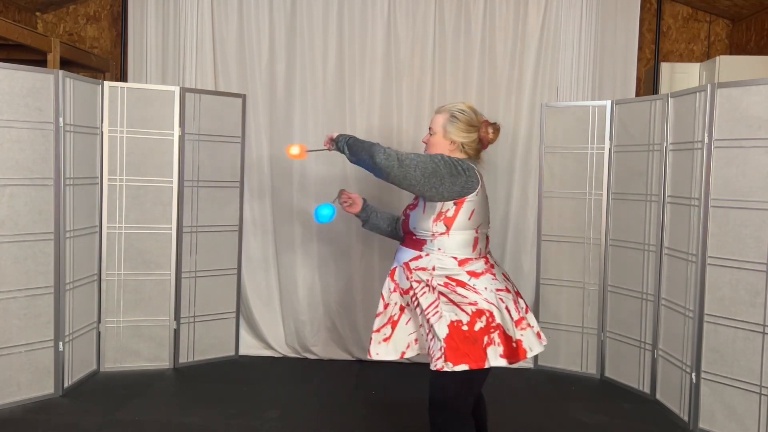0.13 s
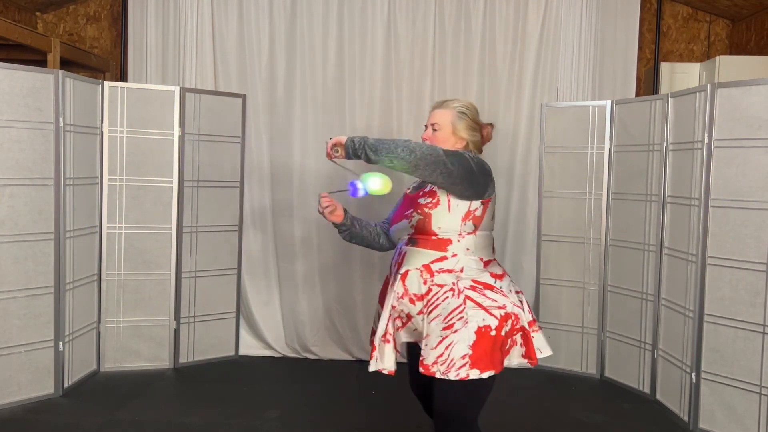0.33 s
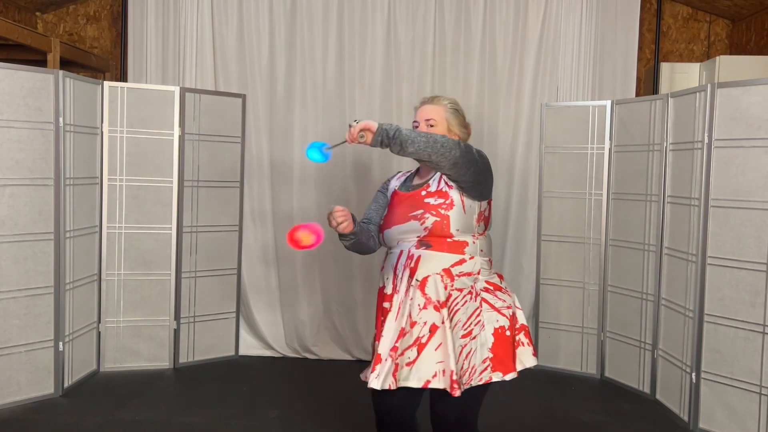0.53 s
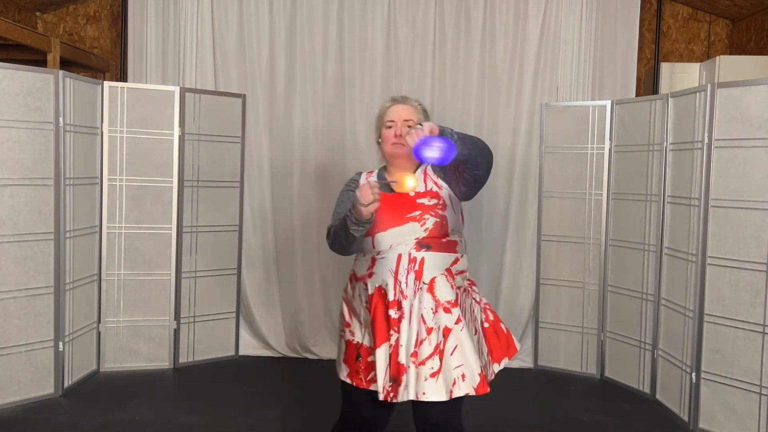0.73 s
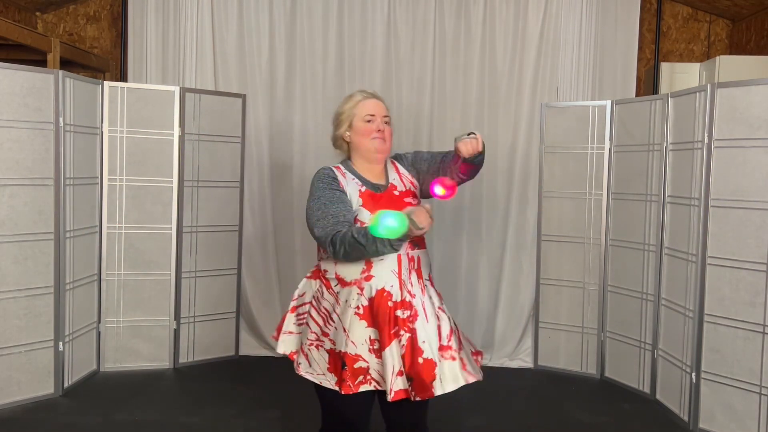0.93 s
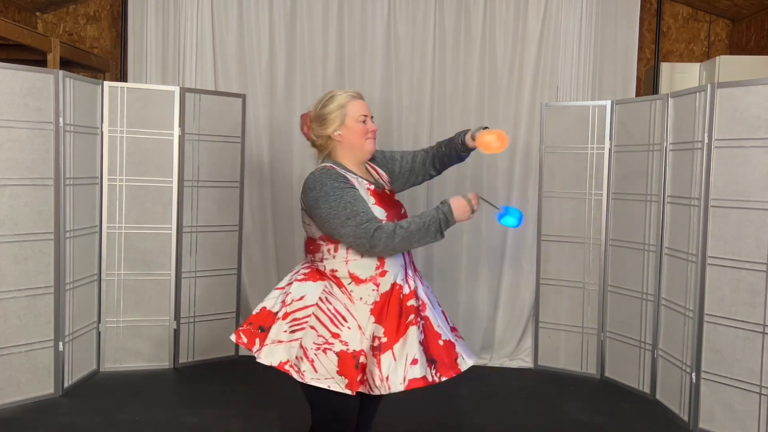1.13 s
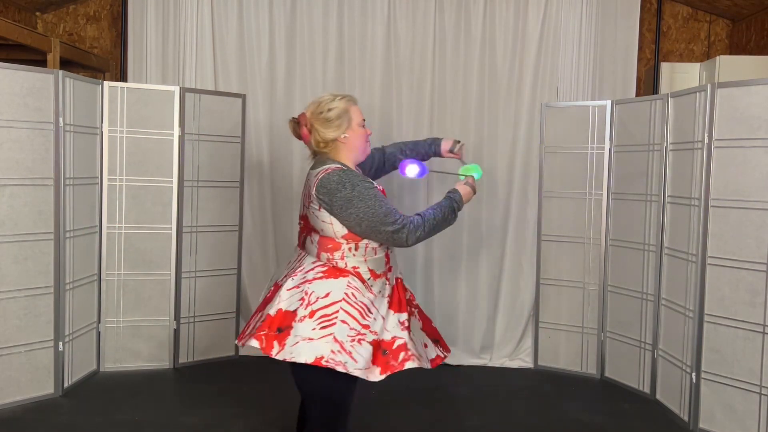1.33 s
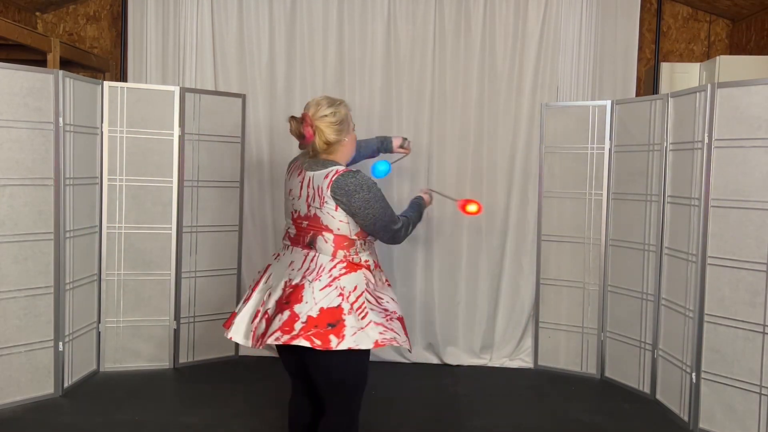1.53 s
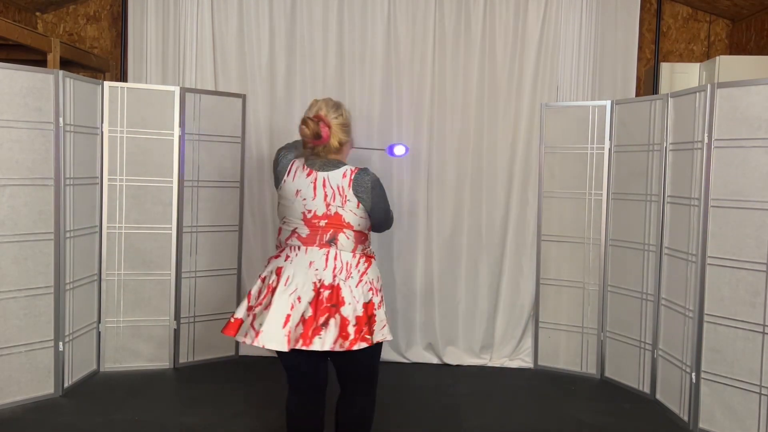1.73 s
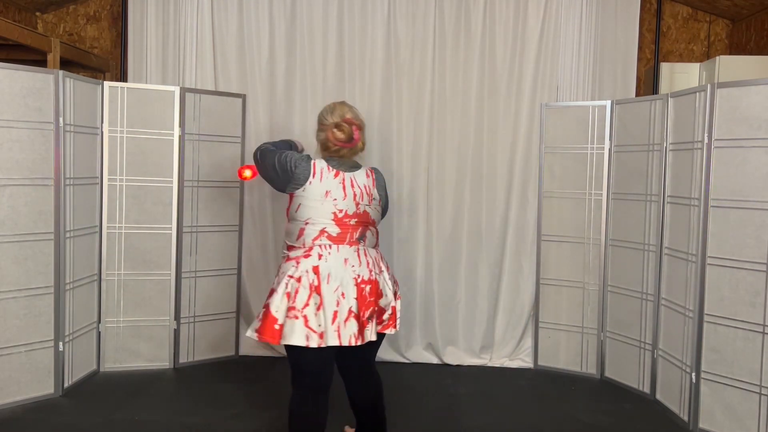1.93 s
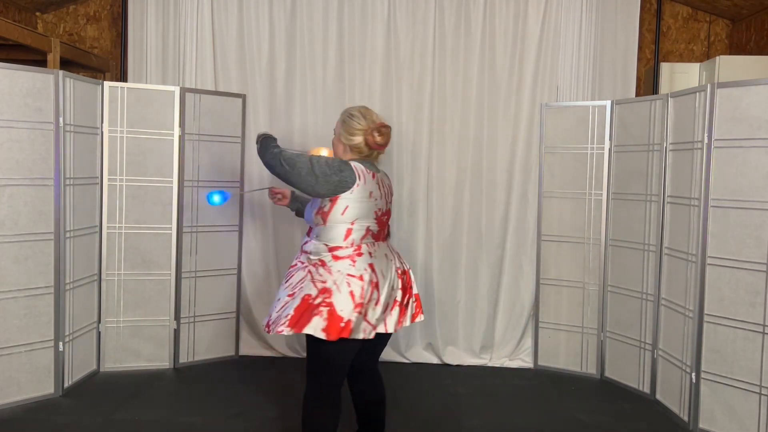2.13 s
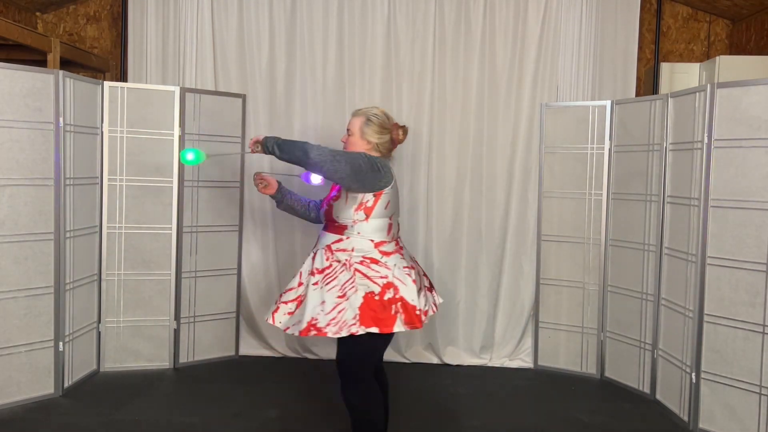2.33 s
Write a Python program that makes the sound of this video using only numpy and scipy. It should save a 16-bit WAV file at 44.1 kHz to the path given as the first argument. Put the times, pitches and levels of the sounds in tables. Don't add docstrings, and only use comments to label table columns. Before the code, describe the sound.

Dancer's footwork on sprung boards: brushing soles, low booms, a cluster of taps, a short squeak, airy whirs from cloth and swung weights, then a final step and long swish, captured indoors at low level over room rumble.

```python
import sys
import numpy as np
from scipy import signal
from scipy.fft import rfft, irfft
from scipy.io import wavfile
from scipy.ndimage import uniform_filter1d

SR = 44100
rng = np.random.default_rng(int(sys.argv[2]) if len(sys.argv) > 2 else 0)


def unload_wav(signal):
    wavfile.write(
        sys.argv[1],
        SR,
        np.round(np.clip(np.atleast_2d(signal).T, -1, 1) * 32767).astype(np.int16),
    )


def linear_from_db(decibels):
    return 10 ** (np.asarray(decibels, float) / 20)


N = 104781
SWISH_FALL_DB_PER_S = 291
GRAINS_PER_S, GRAIN_SPREAD_DB = 9000, 0.5
SLIPS_PER_S, SLIP_SPREAD_DB = 2700, 3


def evened(x):
    return x / np.sqrt(np.mean(x ** 2) + 1e-20)


def read(points, hz):
    f, value = np.transpose(points)
    return np.interp(np.log(hz + 1), np.log(f + 1), value)


def colour(x, points):
    gain = linear_from_db(read(points, np.fft.rfftfreq(N, 1 / SR)))
    return irfft(rfft(x) * gain, N)


def stroke(start, rise, hold, level_db, fall_db):
    t = np.arange(N) / SR - start
    swell = np.clip(t / rise, 0, 1) ** 2
    return swell * linear_from_db(level_db - fall_db * np.clip(t - rise - hold, 0, None))


def combined(rows, fall_db):
    return np.sqrt(sum(stroke(*row[:4], fall_db) ** 2 for row in rows))


def drift(hz):
    low_pass = signal.butter(2, hz, fs=SR, output="sos")
    return evened(signal.sosfiltfilt(low_pass, rng.standard_normal(N)))


def grit(rate, spread_db):
    size = linear_from_db(spread_db * np.minimum(rng.exponential(1, (2, N)), 5))
    size = size * rng.choice([-1., 1.], (2, N))
    return evened(size * (rng.random((2, N)) < rate / SR))


def ring(x, hz, q):
    b, a = signal.iirpeak(hz, q, SR)
    y = signal.lfilter(b, a, signal.lfilter(b, a, x))
    span = int(SR * max(8 / hz, .02))
    return y / np.sqrt(abs(uniform_filter1d(y ** 2, size=span)) + 1e-12)


def rings(rows, drive, q, fall_db):
    return sum(ring(drive, row[4], q) * stroke(*row[:4], fall_db) for row in rows)


def hum():
    # f/Hz, level/dB
    hum_spectrum = [(25, -13), (45, -5), (260, -14), (430, -25.5), (1200, -39), (9500, -56), (12800, -49),
                    (16000, -76)]
    # t/s, level/dB
    busy = [(0, 0.5), (.35, -0.5), (.5, -1), (.8, -2), (.95, 2), (1.12, 1), (1.22, -3.5), (1.35, -2.5),
            (1.42, 4), (1.58, 1), (1.68, -2.5), (2.0, -0.5), (2.12, 3.5), (2.3, 1), (2.38, -1.5)]
    z = signal.stft(rng.standard_normal((2, N)), nperseg=2048)[2]
    local = uniform_filter1d(uniform_filter1d(abs(z) ** 2, size=3, axis=1), size=5, axis=2)
    noise = signal.istft(z / np.sqrt(local), nperseg=2048)[1][:, :N]
    rumble_db = np.interp(np.arange(N) / SR, *np.transpose(busy))
    return linear_from_db(rumble_db - 51.5) * evened(colour(noise, hum_spectrum))


def boom():
    # start t/s, rise t/s, hold t/s, level/dB, f/Hz
    landings = [(0, .03, 0.081, -48.5, 52.1), (0.13, 0.028, 0.033, -47, 52.3),
                (0.225, 0.023, 0.025, -40.5, 52), (0.296, 0.0096, 0.075, -45, 55),
                (0.46, 0.042, 0.032, -50, 55.7), (0.54, 0.048, 0.047, -45.5, 53.3),
                (0.796, 0.051, 0.027, -43.5, 55.8), (0.86, 0.023, 0.019, -36, 50.7),
                (0.917, 0.025, 0.03, -38.5, 54.3), (1.037, 0.031, 0.07, -49, 59.3),
                (1.101, 0.029, .04, -47, 57.4), (1.184, 0.02, 0.032, -46, 56.3),
                (1.294, 0.025, 0.074, -49, 54.3), (1.427, 0.031, 0.044, -46, 54.8),
                (1.516, 0.024, 0.0086, -39, 55.6), (1.569, 0.017, 0.041, -41, 54.8),
                (1.67, 0.034, 0.037, -49.5, 55.7), (2.037, 0.044, 0.027, -49, 59.5),
                (2.109, 0.031, 0.034, -39.5, 54.9), (2.169, 0.03, 0.051, -39.5, 51.5),
                (2.26, 0.028, 0.012, -41, 55.85)]
    start, rise, _, _, hz = np.transpose(landings)
    level = combined(landings, 375) * linear_from_db(0.6 * drift(14))
    pitch = np.interp(np.arange(N) / SR, start + rise, hz) + 1.36 * drift(6.2)
    return np.sqrt(2) * level * np.sin(2 * np.pi * np.cumsum(pitch) / SR)


def thumps():
    # start t/s, rise t/s, hold t/s, level/dB, f/Hz
    impacts = [(0.2, 0.009, 0.048, -52.5, 269), (.625, 0.0057, 0.039, -47, 244), (.7, .02, 0.041, -51, 236),
               (0.7, 0.0088, 0.036, -58, 146), (1.9, 0.011, 0.069, -53.5, 146),
               (2.008, 0.01594, 0.1, -53, 243), (1.5, 0.035, 0.05, -52.5, 145),
               (0.5, 0.011, 0.012, -55, 241), (0.56, 0.016, 0.058, -50.5, 161),
               (0.12, 0.016, 0.078, -52.5, 122), (2.015, 0.011, 0.042, -53, 150), (5, .02, .04, -56, 330),
               (-0.1, 0.024, 0.061, -56.5, 270), (1.09, .01, 0.045, -58, 350), (0, .015, 0.02, -56, 233)]
    return rings(impacts, grit(600, 1.54), q=2.43, fall_db=259)


def knock():
    start_s, t60_s = .215, 0.032
    t = np.clip(np.arange(N) / SR - start_s, 0, None)
    return np.sin(2 * np.pi * 199.4 * t) * stroke(start_s, 0.013, 0.038, -41, 60 / t60_s)


def pings():
    # t/s, peak level/dB, f/Hz, decay T60 t/s
    struck = [(.636, -46, 510, 0.025), (.642, -38.5, 200, 0.044), (0.72, -42, 300, 0.047),
              (0.61, -40, 224, .04), (.668, -41, 250, 0.029), (.7015, -40.5, 206, .04),
              (.659, -47, 420, .03), (.7135, -40.5, 1270, .035), (.7205, -38.5, 1300, 0.057),
              (.728, -44, 1350, .05), (.806, -48, 1360, 0.028), (1.5095, -42, 1010, 0.019),
              (1.5095, -45.5, 1580, 0.01), (1.5095, -45, 2130, 0.011), (1.518, -43, 670, 0.016),
              (1.516, -47, 2300, .012), (2.006, -44.5, 620, 0.024), (2.032, -45, 650, .04),
              (2.041, -43.5, 680, 0.026), (2.05, -38, 160, .03), (2.4, -43.5, 190, .03),
              (2.055, -38.5, 180, 0.039), (2.093, -38, 195, 0.045), (2.027, -42.5, 1950, 0.026)]
    out, t = np.zeros(N + SR), np.arange(6000) / SR
    for s, db, hz, t60 in struck:
        out[round(s * SR):][:len(t)] += linear_from_db(db - 60 * t / t60) * np.sin(2 * np.pi * hz * t)
    return out[:N]


def taps():
    # t/s, peak level/dB, upper f/Hz
    edge_hits = [
        (0.628, -43.5, 1410),
        (0.704, -60, 13900),
        (1.509, -44, 2200),
        (1.52, -44, 2000),
        (2.005, -42.5, 8600),
        (2.015, -46, 3063),
        (1.023, -49.5, 15000),
        (2.063, -49, 5000),
    ]
    t60_s, low_hz = .03, 380
    out, t = np.zeros((2, N + SR)), np.arange(4000) / SR
    for s, db, hz in edge_hits:
        band = signal.butter(4, [low_hz, hz], "band", fs=SR, output="sos")
        burst = rng.standard_normal((2, len(t))) * linear_from_db(-60 * t / t60_s)
        burst = signal.sosfilt(band, burst)
        out[:, round(s * SR):][:, :len(t)] += linear_from_db(db) * burst / abs(burst).max()
    return out[:, :N]


def squeaks():
    # start t/s, rise t/s, hold t/s, level/dB, f/Hz
    rubs = [
        (1.024, 0.036, .045, -52.5, 1320),
        (1.06, .03, 0.018, -52.5, 840),
        (1.03, .015, .015, -65, 840),
        (1.04, 0.027, .035, -57, 1690),
        (0.13, 0.027, .05, -67, 1300),
        (2.01, .01, 0.024, -62, 2400),
    ]
    return rings(rubs, grit(SLIPS_PER_S, SLIP_SPREAD_DB), q=4.9, fall_db=600)


def drags():
    # start t/s, rise t/s, hold t/s, level/dB, f/Hz
    scrapes = [(-.01, 0.0058, 0.0061, -55, 1240), (.04, 0.059, 0.046, -65.5, 1440),
               (.14, 0.03, 0.15, -77, 1230), (.62, 0.0034, 0.013, -62, 1103),
               (.702, 0.0054, 0.029, -48, 1490), (.76, 0.015, 0.012, -55.5, 1900),
               (.86, .03, 0.046, -80, 2170), (1.018, 0.017, 0.06, -58.5, 1420),
               (1.025, 0.037, 0.043, -60.5, 890), (1.28, 0.015, 0.14, -60, 1730),
               (1.508, 0.0034, 0.006, -56.5, 1110), (1.53, 0.024, 0.013, -67, 1484),
               (2.005, 0.0047, 0.038, -51.5, 1790), (2.005, 0.0087, 0.047, -53.5, 727),
               (2.07, 0.0087, 0.022, -52, 1500), (2.31, 0.075, 0.024, -57.5, 990),
               (.625, .012, .04, -56.5, 560), (.87, 0.01, 0.017, -54.5, 580),
               (.2, 0.016, 0.014, -60.5, 620), (.72, 0.0071, 0.019, -53.5, 800),
               (.702, 0.0065, 0.027, -54, 2170)]
    return rings(scrapes, grit(SLIPS_PER_S, SLIP_SPREAD_DB), q=1.79, fall_db=265)


def whirs():
    # start t/s, rise t/s, hold t/s, level/dB, centre f/Hz
    passes = [
        (1.21, 0.031, 0.039, -64, 3000),
        (1.293, 0.066, 0.13, -54.5, 3250),
        (1.017, 0.037, 0.045, -59, 5250),
        (2.124, 0.06, 0.062, -55, 4970),
        (2.1, 0.093, 0.059, -57, 7100),
        (0.388, 0.086, 0.26, -71, 1310),
        (0.578, 0.028, 0.024, -79, 5600),
        (0.715, 0.1, 0.067, -57, 4300),
    ]
    return rings(passes, grit(GRAINS_PER_S, GRAIN_SPREAD_DB), q=2.05, fall_db=SWISH_FALL_DB_PER_S)


def swishes():
    # start t/s, rise t/s, hold t/s, level/dB, airy top level/dB
    sweeps = [(-.01, 0.0045, 0.015, -49.5, -10.5), (0.031, 0.039, 0.039, -59, -5),
              (0.106, 0.055, 0.073, -52.5, -3), (0.238, 0.028, 0.081, -61, -4), (0.39, 0.09, 0.1, -73.5, 9),
              (0.695, 0.0073, 0.039, -53.5, -2), (0.736, 0.094, 0.088, -53, 1.5),
              (1.016, 0.023, 0.05, -73, 27), (1.186, 0.054, 0.068, -70, 2.5),
              (1.252, 0.067, 0.098, -51, -2.5), (1.387, 0.052, 0.074, -53.5, -24),
              (1.488, 0.042, 0.027, -62, -6), (2.003, 0.0022, 0.013, -59, 0.5),
              (2.005, 0.12, 0.052, -52, -2.5), (2.117, 0.08, 0.054, -51.5, -2.5)]
    # f/Hz, level/dB
    body_spectrum = [(350, -11), (800, -5.5), (1700, 2), (2600, -3), (4200, -3.5), (7000, -9.5),
                     (9500, -11.5), (16000, -25.5)]
    # f/Hz, level/dB
    air_spectrum = [(6000, -23.5), (9000, -20.5), (11800, -8), (13500, -12), (14500, -18), (15500, -11),
                    (16000, -9)]
    patch_db, flutter_db, air_fall_db_per_s = -1.5, 1, 267
    z = signal.stft(grit(GRAINS_PER_S, GRAIN_SPREAD_DB), nperseg=512)[2]
    patches = uniform_filter1d(rng.standard_normal(z.shape[1:]), 6, 0)
    patches = evened(uniform_filter1d(patches, 7, 1))
    grains = signal.istft(z * linear_from_db(patch_db * patches), nperseg=512)[1][:, :N]
    grains = grains * linear_from_db(flutter_db * drift(60))
    body, air = colour(grains, body_spectrum), colour(grains, air_spectrum)
    scale = linear_from_db(2.0) / np.sqrt(np.mean(body ** 2))
    body_level = combined(sweeps, SWISH_FALL_DB_PER_S)
    tops = [(start, rise, hold, db + top_db) for start, rise, hold, db, top_db in sweeps]
    return scale * (body * body_level + air * combined(tops, air_fall_db_per_s))


def room(x):
    t60_s, first_s = 0.29, .008
    t = np.arange(SR // 2) / SR
    echoes = rng.choice([-1., 1.], (2, len(t))) * (rng.random((2, len(t))) < .05)
    echoes = echoes * linear_from_db(-60 * t / t60_s) * (t > first_s)
    echoes = signal.lfilter([1], [1, -.6], echoes)
    return signal.fftconvolve(x, echoes / np.linalg.norm(echoes[0]), axes=1)[:, :N]


def scene():
    background = hum() + boom()
    impacts = thumps() + knock() + pings() + taps()
    moves = impacts + drags() + whirs() + swishes()
    return background + squeaks() + moves + linear_from_db(-12) * room(moves)


def roll_off(x):
    return signal.sosfilt(signal.butter(12, 16290, fs=SR, output="sos"), x)


def record(dry):
    # f/Hz, likeness (0 to 1)
    likeness = [(60, 1), (150, 0.91), (300, 0.62), (650, 0.087), (2000, 0.54), (6000, 0.41), (7300, 0.53),
                (8800, 0.86)]
    # f/Hz, level/dB
    balance = [(100, 0), (300, 1.5), (1000, -2.5), (2200, -1), (3500, -3), (5800, -11), (7300, 0.5),
               (9000, -1)]
    zero_hz, turn_hz, low_rad, dwell_rad = 7210, 4710, -0.98, .33
    edge_hz, edge_slope_hz, end_s = 15850, 200, 2.377
    hz = np.fft.rfftfreq(N, 1 / SR)
    a, b = rfft(dry)
    same = np.clip(read(likeness, hz), 0, 1)
    lean = linear_from_db(read(balance, hz) / 2)
    treble = hz > zero_hz - 1200
    turning = 2 * np.pi * (hz - zero_hz) / turn_hz
    lead = np.where(treble, turning, low_rad * np.minimum(hz / 500, 1))
    lead = lead - dwell_rad * hz / zero_hz * np.sin(2 * lead) * treble
    right = same * a * np.exp(-1j * lead) + np.sqrt(1 - same ** 2) * b
    band_edge = np.clip((edge_hz - hz) / edge_slope_hz, 0, 1) ** 2
    pair = irfft(np.array([a * lean, right / lean]) * band_edge, N)
    return roll_off(pair * (np.arange(N) < end_s * SR))


dry = scene()
out = record(dry)
unload_wav(out)
```